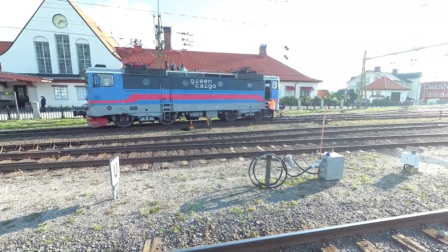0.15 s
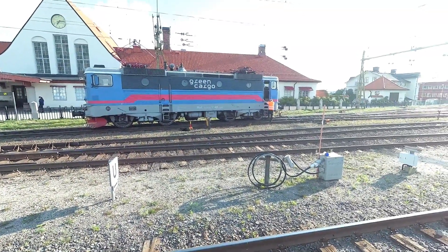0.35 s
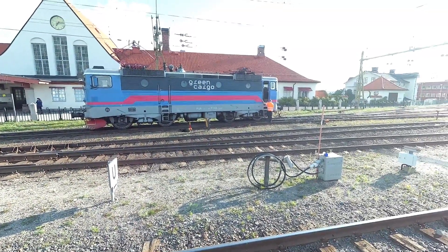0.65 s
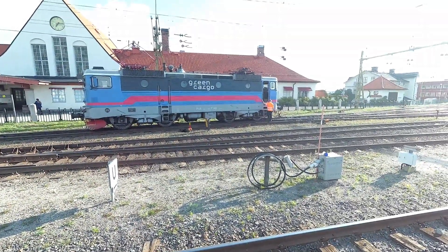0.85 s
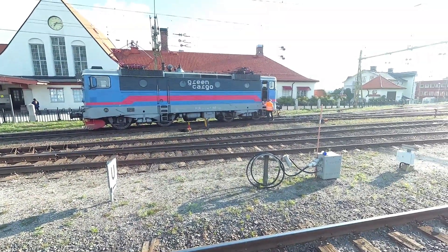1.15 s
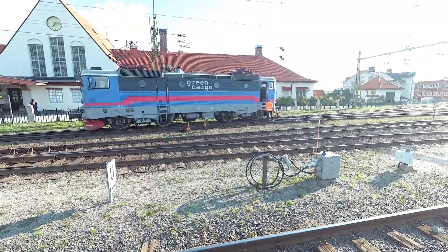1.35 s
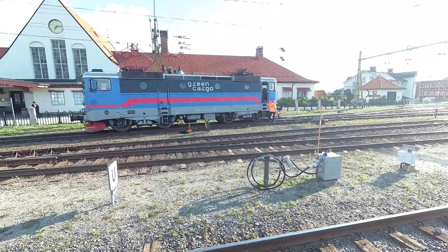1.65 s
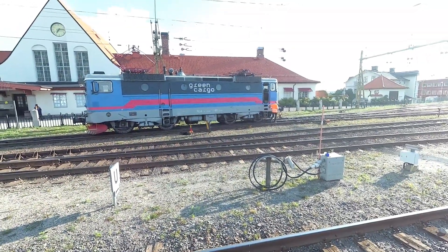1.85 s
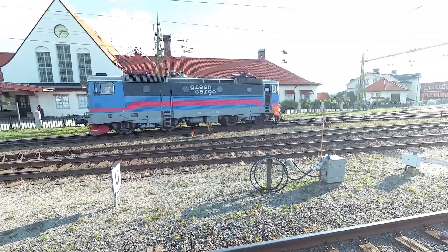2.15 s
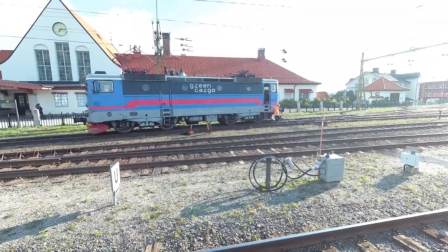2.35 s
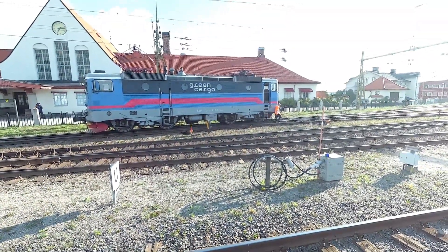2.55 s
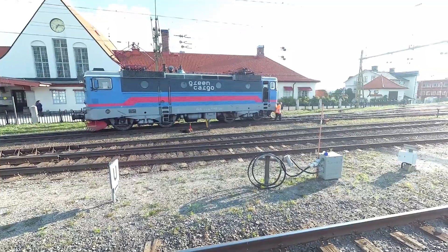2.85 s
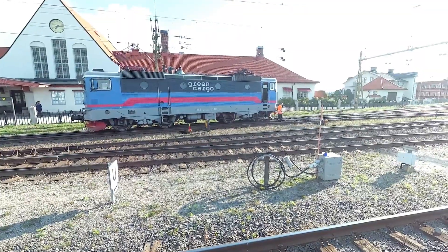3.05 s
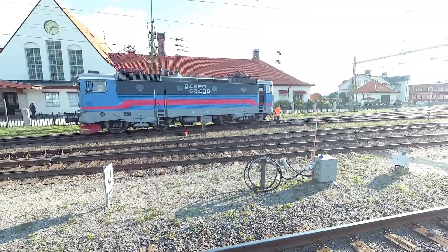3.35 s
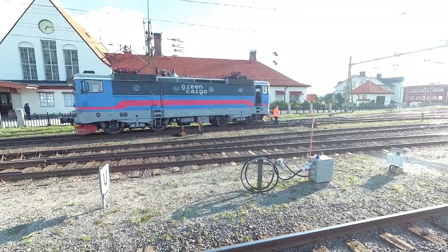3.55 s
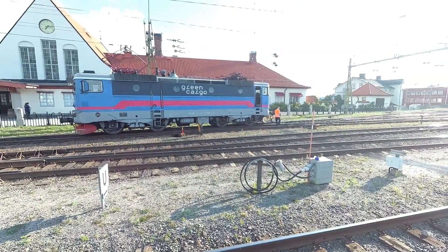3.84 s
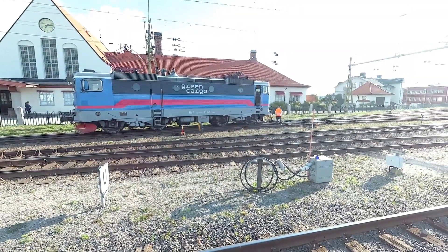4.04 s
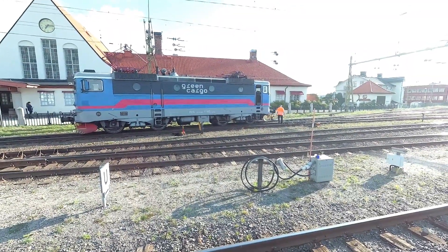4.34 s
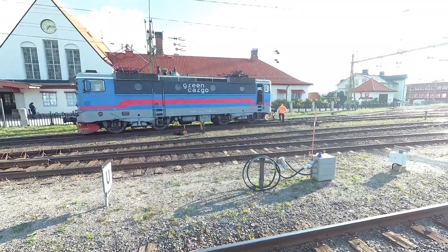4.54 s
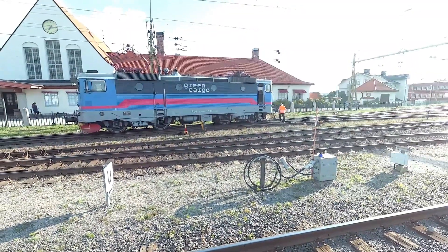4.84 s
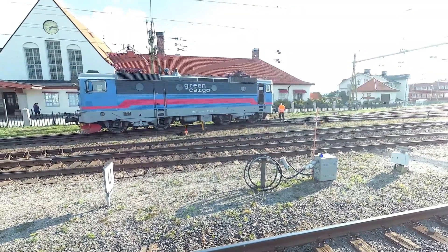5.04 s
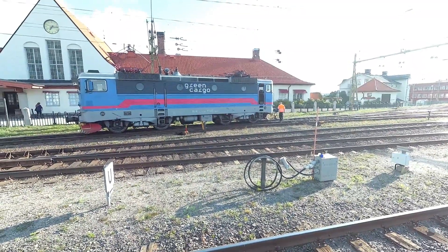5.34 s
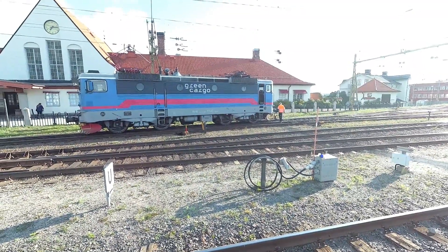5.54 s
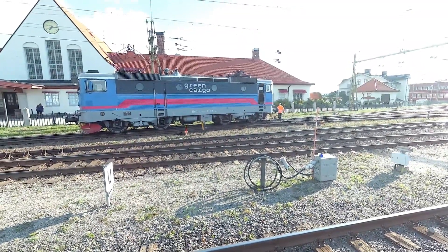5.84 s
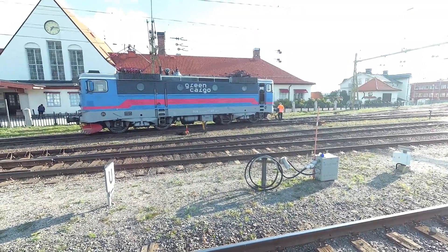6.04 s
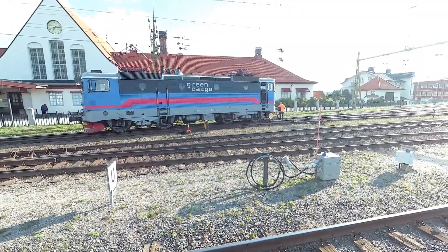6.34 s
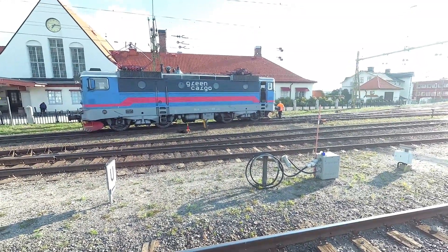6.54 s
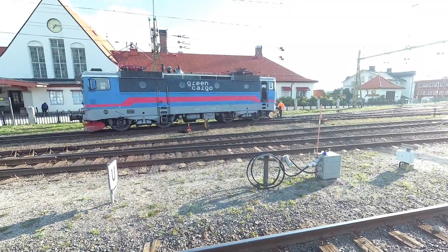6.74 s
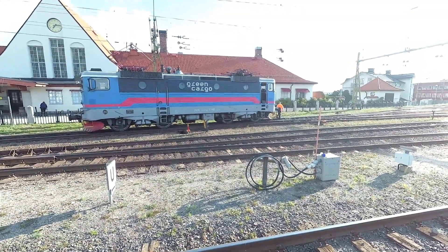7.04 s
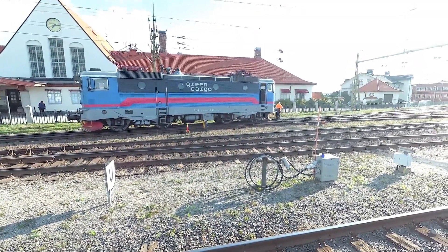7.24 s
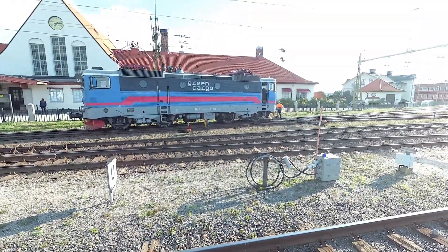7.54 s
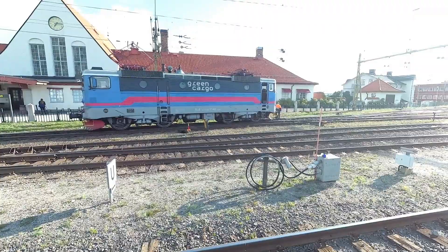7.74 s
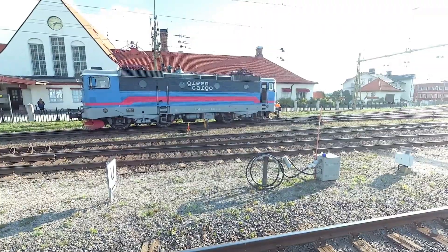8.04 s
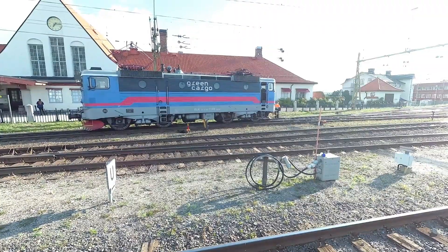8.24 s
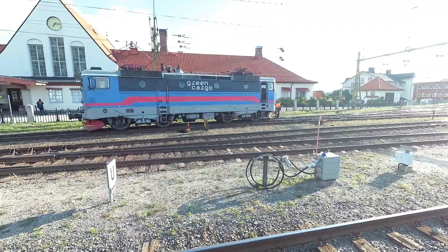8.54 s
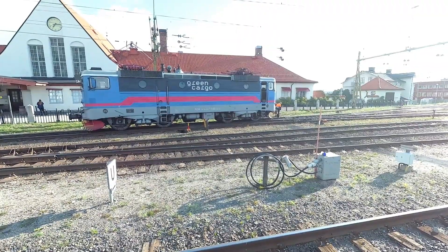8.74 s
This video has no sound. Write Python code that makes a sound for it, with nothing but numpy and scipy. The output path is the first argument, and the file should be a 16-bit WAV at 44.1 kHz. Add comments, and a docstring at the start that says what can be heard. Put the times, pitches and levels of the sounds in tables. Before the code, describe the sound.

Steady ventilation drone at a rail yard, a whistling air leak dying away midway, then rough wind buffets and overloaded crackles in the right channel.

```python
"""An electric locomotive stands across the tracks at a station: fans drone through ringing ducts, with a blade whine.
From the start a jet of compressed air hisses, rings its valve and whistles, then dies away around the middle.
Shaped noise makes the wind in the two microphone ports, first in puffs; a few light taps ring the casing.
From about 5 s gusts and sharp crackles overload the right channel, while the fans drone on."""
import sys
import numpy as np
from scipy import signal
from scipy.fft import rfft, irfft
from scipy.io import wavfile
from scipy.ndimage import uniform_filter1d, map_coordinates

SR = 44100
rng = np.random.default_rng(int(sys.argv[2]) if len(sys.argv) > 2 else 0)


def output_pcm(signal):
    """Save a mono or channel-first signal as 16-bit PCM at the path in sys.argv[1].

    Samples are clipped to [-1, 1] before scaling.
    """
    pcm = np.clip(np.atleast_2d(signal).T, -1, 1) * 32767
    wavfile.write(sys.argv[1], SR, np.round(pcm).astype(np.int16))


N = 392049
T = np.arange(N) / SR  # s
FREQS = np.maximum(np.arange(N // 2 + 1) * SR / N, 1)  # Hz

# colour of the turbulence in a port: f/Hz, relative density/dB per Hz
TURBULENCE_COLOUR = [(25, -32), (60, -28), (110, -18), (170, 4), (240, 7.5), (320, -1), (480, -13),
                     (750, -21.5), (1100, -35.5), (2000, -47.5), (4000, -54.5), (16000, -105)]


def undb(db):
    """Decibels to gain."""
    return 10 ** (np.asarray(db) / 20)


def curves(table):
    """Each column of a time table, joined by straight lines."""
    s, *columns = np.transpose(table)
    return [np.interp(T, s, column) for column in columns]


def colours(table):
    """Each column of a spectrum table as a gain over frequency, straight in dB over log frequency."""
    hz, *columns = np.transpose(table)
    return [undb(np.interp(np.log(FREQS), np.log(hz), column)) for column in columns]


def resonances(table):
    """Gain over frequency of a set of steep-sided resonances, added in power."""
    power = 0
    for hz, width, db in table:
        # the factor makes width the full width at -3 dB
        power = power + (undb(db) / (1 + ((FREQS - hz) / (.78 * width)) ** 2)) ** 2
    return np.sqrt(power)


def noise(gain):
    """Noise whose density per Hz follows the gain."""
    return irfft(rfft(rng.standard_normal(N)) * gain, N) * np.sqrt(SR / 2)


def walk(rate):
    """Random levels held for 1 / rate s and smoothed twice; spread near 1."""
    k = max(int(SR / rate), 2)
    steps = rng.standard_normal(4096)[np.arange(N) // k % 4096]
    return 1.3 * uniform_filter1d(uniform_filter1d(steps, k), k)


def swell(s, length):
    """Smooth bump of height 1 around a moment."""
    return np.exp(-(2 * (T - s) / length) ** 2)


def blowers(sway_db=0.56, flutter_db=1.0, wander_hz=0.73, octave_db=-26, right_db=-1.0, blade_db=1):
    """Fans push air through ringing ducts; the blade tone flutters in the moving air."""
    blade_hz, left_lag_s = 818.2, .0001
    # broad blower air: f/Hz, density/dB per Hz
    fan_air = [(30, -77), (80, -61.5), (115, -57), (160, -50.5), (250, -46), (400, -51), (490, -59.5),
               (600, -57), (790, -53.5), (950, -62.5), (1120, -68.5), (1340, -66), (1700, -84.5),
               (16000, -135)]
    # duct and body resonances: f/Hz, width/Hz, density/dB per Hz
    duct_modes = [(171.6, 24, -49), (242.5, 12.6, -43), (262, 35, -45.5), (364.4, 12, -50.5),
                  (550.6, 18.5, -51), (595, 26, -50), (660, 31, -55), (855, 12, -56), (1632, 29, -65)]
    # blade whine as the breeze carries it: t/s, level before blade_db/dB
    whine_level = [(0, -47), (.15, -39), (.5, -40), (.8, -34), (.95, -29), (1.08, -36), (1.22, -31),
                   (1.45, -37), (1.7, -33), (1.92, -30), (2.08, -35.5), (2.3, -33), (2.5, -33), (2.76, -37),
                   (2.9, -31.5), (3.08, -31), (3.35, -35), (3.75, -32.5), (4.1, -35), (4.6, -34),
                   (4.78, -40), (5, -31), (5.3, -33), (5.62, -33), (5.78, -38), (5.93, -29.5), (6.1, -33),
                   (6.45, -35), (6.7, -32), (7, -36), (7.25, -32), (7.7, -37), (8.1, -29), (8.45, -34),
                   (8.89, -40)]
    rush = noise(colours(fan_air)[0]) + noise(resonances(duct_modes))
    rush = rush * undb(sway_db * walk(4.4))
    phase = 2 * np.pi * np.cumsum(blade_hz + wander_hz * walk(14)) / SR
    blade = np.sin(phase) * undb(flutter_db * walk(12.0))
    octave = np.sin(2 * phase) * undb(octave_db + flutter_db * walk(37))
    whine = np.sqrt(2) * (blade + octave) * undb(blade_db + curves(whine_level)[0])
    fans = rush + whine
    return np.array([np.interp(T - left_lag_s, T, fans), fans * undb(right_db)])


def yard(sway_db=1.0):
    """Machine noise scattered by buildings and ballast arrives from all sides."""
    # diffuse rush: f/Hz, left density/dB per Hz, right density/dB per Hz
    diffuse_rush = [(30, -89, -80), (201, -62, -46.5), (497, -74, -66), (815, -67.5, -77.5),
                    (1430, -78, -70), (1780, -87, -72), (2360, -81, -70.5), (2890, -91.5, -81.5),
                    (3460, -86, -80), (4740, -92.5, -89.5), (6500, -99, -97.5), (8200, -99.5, -93),
                    (10900, -104, -96.5), (12200, -106, -102), (15500, -108, -106)]
    return np.array([noise(gain) * undb(sway_db * walk(7.7)) for gain in colours(diffuse_rush)])


def air_leak(flicker_db=0.55, ring_sway_db=2, sizzle_left_db=-9):
    """A jet of compressed air hisses, rings its valve and whistles while the pressure lasts."""
    # flow of the escaping air, shared by hiss, valve ring and pipe note: t/s, relative level/dB
    air_flow = [(0, -6.5), (1.1, -5), (1.6, -2), (2.3, -2.5), (3.1, -1), (3.8, -4), (4.1, -9.5), (4.7, -12),
                (5.3, -20.5), (8.89, -25.5)]
    # hiss at full flow: f/Hz, left density/dB per Hz, right density/dB per Hz
    jet_hiss = [(300, -71, -74.5), (890, -54.5, -65.5), (1060, -67.5, -57.5), (1150, -79, -82),
                (1300, -71, -76), (1560, -84, -68), (1760, -92, -81.5), (2000, -78.5, -70.5),
                (2460, -90, -78), (3040, -89, -82), (4800, -87, -83.5), (6100, -84.5, -76),
                (7950, -84, -75.5), (9300, -92, -82.5), (10900, -105, -81.5), (12300, -92, -84.5),
                (14000, -91, -86.5), (15700, -102, -87.5)]
    # valve and pipe at full flow: f/Hz, width/Hz, right density/dB per Hz, left minus right/dB
    valve_modes = [(948, 20, -57, 4), (1190, 40, -64, 2), (1310, 45, -63, -1), (1378, 36, -58.5, -2),
                   (1455, 26, -61.5, -1), (1890, 50, -72, -9), (2040, 34, -60.3, -16), (2570, 36, -70, -14),
                   (4190, 80, -78, -9), (5487, 48, -73, -9), (5600, 36, -70, -9), (5824, 65, -68, -9),
                   (5965, 48, -73, -9), (6218, 50, -76, -9), (6535, 32, -68.5, -9), (7588, 28, -69, -9),
                   (7881, 38, -66.5, -9), (8170, 95, -71, -9), (10080, 150, -81, -9), (10400, 100, -79, -9),
                   (10820, 80, -79, -9), (11000, 70, -76, -9), (11180, 70, -79, -9)]
    # thin sizzle of the last air: f/Hz, width/Hz, right density/dB per Hz
    sizzle_modes = [(8050, 160, -83), (8500, 90, -87), (10450, 70, -85), (11090, 70, -75.5),
                    (11600, 150, -85), (13400, 100, -85), (14350, 120, -91)]
    flow_db = curves(air_flow)[0]
    hiss = bounced(from_right(*colours(jet_hiss)))
    # three interleaved sets of modes, each swaying on its own
    ring = sum(valve_ring(valve_modes[i::3]) * undb(ring_sway_db * walk(12)) for i in range(3))
    jet = (hiss + ring) * undb(flow_db + flicker_db * walk(22))
    # as the flow closes down, only a thin high sizzle lingers
    thin = resonances(sizzle_modes)
    sizzle = from_right(thin * undb(sizzle_left_db), thin) * swell(4.3, 1.1)
    return jet + sizzle + pipe_note(flow_db) + whistle()


def from_right(left, right, left_lag_s=.00019):
    """Noise from the right: its direct share reaches the left port later, the rest is scattered."""
    # share that reaches the ports unscattered: f/Hz, share/dB
    direct_share = [(300, -2), (800, -.4), (1500, -.6), (2200, -4), (8000, -3), (10500, -4), (12000, -10)]
    direct = colours(direct_share)[0]
    source = rfft(rng.standard_normal(N))
    late = np.exp(-2j * np.pi * FREQS * left_lag_s)
    straight = irfft(source * direct * np.array([left * late, right]), N) * np.sqrt(SR / 2)
    scattered = np.array([noise(gain * np.sqrt(1 - direct ** 2)) for gain in (left, right)])
    return straight + scattered


def bounced(x, bounce_s=.00305, drift_s=.000015, bounce_db=-11):
    """Adds a ground reflection that combs the sound; its delay drifts as the microphone sways."""
    earlier = T - bounce_s - drift_s * walk(1.5)
    return x + undb(bounce_db) * np.array([np.interp(earlier, T, side) for side in x])


def valve_ring(modes):
    """A set of valve resonances blown by the jet, each with its own balance."""
    left = resonances((hz, width, db + lean_db) for hz, width, db, lean_db in modes)
    right = resonances((hz, width, db) for hz, width, db, _ in modes)
    return from_right(left, right)


def pipe_note(flow_db, note_hz=4015, width_hz=72, rest_db=-50.5, left_db=-6):
    """A breathy narrow resonance that rests on the flow, with four added swells."""
    # swells of the note: t/s, length/s, right level/dB
    note_swells = [(1.38, .26, -54), (1.7, .28, -53), (3.05, .24, -51.5), (4.3, .5, -61)]
    level = undb(rest_db + flow_db) + sum(undb(db) * swell(s, length) for s, length, db in note_swells)
    gain = resonances([(note_hz, width_hz, 0)])
    note = from_right(gain * undb(left_db), gain)
    return note / note[1].std() * level


def whistle(jitter_hz=.8, flutter_db=0.4, beat_hz=27, left_db=-21):
    """An edge tone that sinks as the pressure falls and beats with a weaker one just below it."""
    # pitch of the upper tone: t/s, f/Hz
    whistle_pitch = [(0, 2474), (.3, 2464), (1.25, 2463), (1.55, 2459), (1.8, 2461), (2.18, 2457),
                     (2.3, 2461), (2.7, 2458), (3.62, 2455), (3.72, 2462), (4.1, 2454)]
    # swells as the jet finds the edge, beats at full flow, drops when the pressure gives out:
    # t/s, right level of the upper tone/dB, lower tone relative to it/dB
    whistle_level = [(0, -49, -22), (.18, -39.5, -22), (.3, -42, -22), (.7, -40, -22), (1.1, -41, -22),
                     (1.2, -44, -22), (1.33, -40.5, -22), (1.48, -41, -20), (1.6, -35.5, -18),
                     (1.75, -38.5, -15), (2.05, -38.5, -17), (2.18, -35.5, -20), (2.28, -41, -10),
                     (2.5, -40.5, -5), (2.9, -41, -2.5), (3.16, -41.5, -5), (3.4, -38, -10),
                     (3.55, -37, -13), (3.62, -37, -24), (3.73, -36.5, -24), (3.77, -43, -24),
                     (3.98, -46.5, -24), (4.12, -56, -24), (4.6, -100, -24)]
    hz = curves(whistle_pitch)[0]
    db, beat_db = curves(whistle_level)
    phase = 2 * np.pi * np.cumsum(hz + jitter_hz * walk(70)) / SR
    lower = phase - 2 * np.pi * np.cumsum(beat_hz + jitter_hz * walk(13)) / SR
    tone = np.sqrt(2) * (np.sin(phase) + undb(beat_db) * np.sin(lower))
    return np.outer(undb([left_db, 0]), tone * undb(db + flutter_db * walk(20)))


def wind(displace=0.58, stumble_db=0.5, stumbles_per_s=36):
    """An uneven breeze buffets both ports; gusts and crackles hit the right, where fast eddies displace slow ones."""
    # light wind between the gusts: t/s, left port strength/dB, right port strength/dB
    light_wind = [(0, -24, -17.5), (.4, -22, -25.5), (1.05, -21, -14), (1.3, -48, -43), (2.15, -57, -69),
                  (2.6, -26.5, -21), (3.08, -22.5, -27), (3.7, -23, -23.5), (4.25, -23, -17),
                  (4.6, -29.5, -38), (5.3, -25, -12.5), (5.75, -36, -45), (6.15, -19, -16.5),
                  (7.2, -35, -18.5), (8.89, -28.5, -26)]
    # strongest eddies, each a thump on one port, keyed by port: start t/s, length/s, level/dB
    port_buffets = {"left": [(.01, 0.034, -14), (.63, 0.025, -12), (1.472, 0.02, -16), (2.93, 0.033, -14.5),
                    (3.04, 0.08, -16), (3.67, 0.036, -12), (4.45, 0.016, -21), (4.845, 0.031, -8.5)],
                    "right": [(.088, 0.011, -4), (.63, 0.017, -8), (.921, 0.018, -0.5), (1.03, 0.018, -4.5),
                    (1.912, 0.031, -14), (2.303, 0.019, -8.5), (2.37, 0.036, -8.5), (2.615, 0.025, -5),
                    (2.757, 0.018, -1.5), (2.772, 0.021, -1), (2.794, 0.013, -4.5), (3.272, 0.037, -8),
                    (3.898, 0.022, -6.5), (4.114, 0.025, -3.5), (4.853, 0.012, -4), (4.92, 0.055, -2.5),
                    (5.008, 0.055, -2.5), (5.092, 0.04, -3), (5.148, 0.0064, -5), (5.18, 0.037, -8.5),
                    (5.218, 0.046, -4.5), (5.308, 0.0074, -9), (5.337, 0.02, -8), (5.382, 0.011, -6.5),
                    (5.424, 0.03, -8.5), (6.094, 0.014, -4), (6.16, 0.021, 0), (6.22, 0.089, -2.5),
                    (6.372, 0.0063, -4.5), (6.417, 0.027, -5.5), (6.49, 0.09, -4.5), (6.612, 0.039, -3),
                    (6.688, 0.035, -7), (6.758, 0.045, -5), (6.812, 0.025, -3), (6.911, 0.079, -2.5),
                    (7.011, 0.0058, -0.5), (7.036, 0.019, -3), (7.376, 0.036, -5), (7.648, 0.039, -12.5),
                    (7.708, 0.0087, -11), (7.916, 0.021, -6), (7.936, 0.045, -3), (8.052, 0.0084, -11),
                    (8.102, .01, -7.5), (8.213, 0.014, -6), (8.238, 0.025, -4.5), (8.289, 0.029, -2.5),
                    (8.34, 0.0088, -7), (8.374, 0.066, -9.5), (8.477, .012, -7.5), (8.614, 0.0067, -6),
                    (8.672, 0.016, -3.5), (8.712, 0.0055, -5), (8.824, 0.011, -10)]}
    # gusts at the right port: start t/s, length/s, level/dB
    right_gusts = [(4.896, 0.37, -6.5), (6.1, 0.79, -11.5), (6.41, 0.2, -1), (7.335, 0.22, -7),
                   (7.797, 0.17, -8), (7.993, 0.55, -7), (8.6, 0.36, -11.5)]
    left_db, right_db = curves(light_wind)
    left = undb(left_db) ** 2 * (1 + stray_eddies()) + passing(port_buffets["left"])
    right = undb(right_db) ** 2 * (1 + stray_eddies()) + passing(port_buffets["right"])
    # a gust's strength stumbles as it blows
    stumble = undb(stumble_db * walk(stumbles_per_s)) ** 2
    right = right + sum(gust(*row) for row in right_gusts) * stumble
    left, right = (turbulence(10 * np.log10(power)) for power in (left, right))
    crackle, strength = snaps()
    return np.array([left, right / (1 + displace * strength) + crackle])


def turbulence(db, flutter_db=-0.51, bright_db=-15, edge_hz=550, fast_db=0.0, fast_scale=1.43):
    """Eddies flutter in one port; strong gusts shed smaller, higher ones that sputter in short bursts."""
    db = db + flutter_db * walk(60)
    fast = .8 / (1 + np.exp((fast_db - db) / 2.5))  # power share of the fast eddies
    body = np.sqrt(1 - fast) * eddies(1) + np.sqrt(fast) * eddies(fast_scale)
    high_pass = FREQS ** 2 / (FREQS ** 2 + edge_hz ** 2)
    fine = noise(colours(TURBULENCE_COLOUR)[0] * high_pass)
    fine = fine * undb(7 * np.tanh(walk(220)))  # sputter within 7 dB either way
    fine = fine / fine.std()
    strength = undb(db)
    brightness = undb(bright_db) * np.sqrt(np.tanh(2 * strength))
    return strength * (body + brightness * fine)


def eddies(scale, swoop=.2, swoops_per_s=110):
    """Port turbulence of unit level; faster flow scales its spectrum upward, and its pitch swoops at random."""
    x = noise(colours([(hz * scale, db) for hz, db in TURBULENCE_COLOUR])[0])
    # the flow sets the strength of the eddies, so most of their own slow swell is evened out
    x = x / uniform_filter1d(x ** 2, size=450) ** .4
    # reading at an uneven pace makes the eddies burble
    pace = np.exp(swoop * walk(swoops_per_s))
    x = map_coordinates(x, [np.cumsum(pace / pace.mean())], order=3, mode="mirror")
    return x / x.std()


def passing(rows, attack_s=0.0044, crest_db=4.5, crest_s=0.0013, release_s=0.0068):
    """Power of eddies that cross a port: a hard front with a brief crest, a hold, a quick fall."""
    power = np.zeros(N)
    for s, length, db in rows:
        near = slice(max(int(s * SR), 0), int((s + length) * SR) + SR // 20)
        age = np.maximum(T[near] - s, 0)
        shape = np.minimum(age / attack_s, 1) * np.exp(-np.maximum(age - length, 0) / release_s)
        power[near] += (shape * undb(db + crest_db * np.exp(-age / crest_s))) ** 2
    return power


def stray_eddies(count=120, per_s=4.4, length_s=0.021, mean_db=3.5, scatter_db=-1):
    """Power of weaker, randomly timed eddies, relative to the light wind that carries them."""
    gaps = rng.exponential(1 / per_s, count)
    sizes = rng.standard_normal(count)
    return passing((s, length_s, mean_db + scatter_db * size) for s, size in zip(np.cumsum(gaps), sizes))


def knocks(right_db=-14):
    """Light taps ring the casing for a few milliseconds."""
    # taps, loudest on the left: t/s, left peak/dB
    tap_times = [(0.631, -9), (1.132, -8), (1.139, -21), (3.579, -7), (3.675, -9), (3.698, -7.5)]
    # what the casing rings with: f/Hz, 60 dB decay time/s, relative level/dB
    casing_modes = [(625, 0.014, 23), (1150, 0.0067, 3), (2100, .003, -40)]
    t = T[:SR // 20]
    ring = np.zeros(len(t))
    for hz, t60, db in casing_modes:
        ring += undb(db) * np.sin(2 * np.pi * hz * t) * np.exp(-np.log(1000) * t / t60)
    taps = np.zeros(N)
    for s, db in tap_times:
        taps[int(s * SR)] += undb(db)
    return np.outer(undb([0, right_db]), signal.fftconvolve(taps, ring / np.abs(ring).max())[:N])


def snaps(sputter_db=2.0, sputters_per_s=450, rise_s=0.0011, fall_s=0.001):
    """Small fast eddies break on the rim of the port in sputtering crackles; gives their sound and strength."""
    # crackles: start t/s, length/s, level/dB
    rim_crackles = [(0.93, 0.0075, -3), (2.305, 0.0051, -15), (2.759, 0.011, -6), (2.776, 0.0057, -3),
                    (2.785, 0.0036, -11), (4.897, 0.015, -8), (4.924, 0.015, -5.5), (4.945, 0.0055, -9),
                    (4.971, 0.0079, -7.5), (5.006, 0.0066, -4), (5.018, 0.019, -5.5), (5.044, 0.019, -14),
                    (5.064, .003, -14), (5.09, 0.015, -6), (5.118, .014, -15), (5.223, 0.0029, -6),
                    (5.239, 0.015, -11), (6.1, 0.0033, -14), (6.161, 0.013, -8), (6.177, 0.0027, -13),
                    (6.215, 0.0042, -8), (6.223, 0.0032, -5), (6.234, 0.011, -2), (6.251, 0.015, -3),
                    (6.283, 0.0052, -8), (6.3, 0.0034, -13), (6.374, .005, -8), (6.415, 0.016, -8),
                    (6.444, 0.01, -7.5), (6.492, .008, -9), (6.503, 0.0089, -6), (6.535, 0.0064, -9),
                    (6.546, 0.015, -10.5), (6.605, 0.0034, -5.5), (6.62, 0.011, -12), (6.761, .007, -3),
                    (6.774, 0.0037, -13), (6.916, .005, -11), (6.947, 0.018, -8.5), (7.059, .005, -18),
                    (7.375, .0035, -13), (7.412, 0.0053, -10), (7.915, .005, -11), (7.94, .005, -12),
                    (7.966, .003, -15), (8.052, 0.0045, -10), (8.105, .003, -13), (8.233, 0.0037, -12.5),
                    (8.24, .012, -6), (8.262, 0.0056, -13), (8.29, .004, -4.5), (8.303, 0.0036, -9)]
    # colour of the crackle: f/Hz, relative density/dB per Hz
    crackle_colour = [(25, -49), (300, 13), (620, 15), (900, 7), (1300, -7), (2400, -41.5), (5000, -37.5),
                      (9000, -45), (16000, -62)]
    strength = np.zeros(N)
    for s, length, db in rim_crackles:
        near = slice(int(s * SR), int((s + length) * SR) + SR // 20)
        age = np.maximum(T[near] - s, 0)
        shape = np.minimum(age / rise_s, 1) * np.exp(-np.maximum(age - length, 0) / fall_s)
        strength[near] += undb(db) * shape
    crackle = noise(colours(crackle_colour)[0])
    crackle = crackle / uniform_filter1d(crackle ** 2, size=180) ** .4  # evens out its own swell
    crackle = crackle * undb(sputter_db * walk(sputters_per_s))
    return strength * crackle / crackle.std(), strength


def gust(start, length, db, attack_s=0.011, sag_db=5.5, release_s=0.032):
    """Power of one gust: it rises fast, sags over its length and drops away."""
    age = T - start
    rise = np.clip(age / attack_s, 0, 1)
    hold = undb(db - sag_db * np.clip(age / length, 0, 1))
    release = np.exp(-np.maximum(age - length, 0) / release_s)
    return (rise * hold * release) ** 2


def scene():
    """Locomotive, yard, wind in the ports and taps on the casing, as left and right."""
    return blowers() + yard() + air_leak() + wind() + knocks()


def record(dry, ceiling=.99, top_hz=15730):
    """Strong gusts flatten against the input's ceiling, each hard corner a tick; the top is cut."""
    clipped = dry / (1 + np.abs(dry / ceiling) ** 24) ** (1 / 24)
    low_pass = signal.ellip(14, .1, 70, top_hz, fs=SR, output="sos")
    return signal.sosfilt(low_pass, clipped)


dry = scene()
out = record(dry)
output_pcm(out)
```